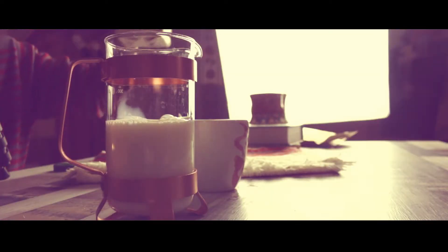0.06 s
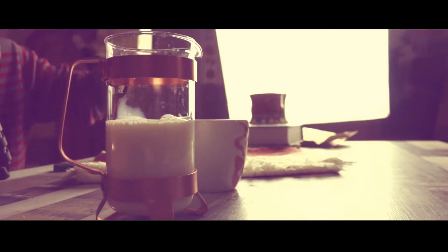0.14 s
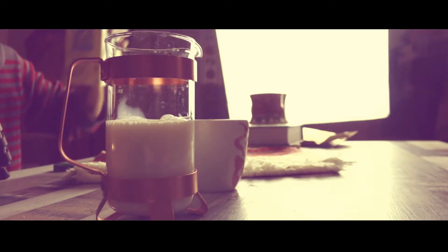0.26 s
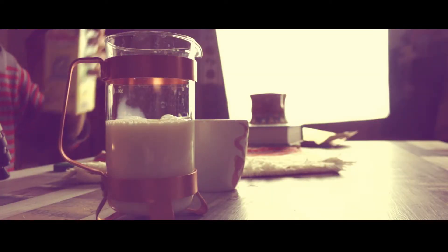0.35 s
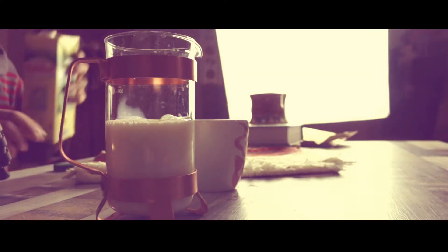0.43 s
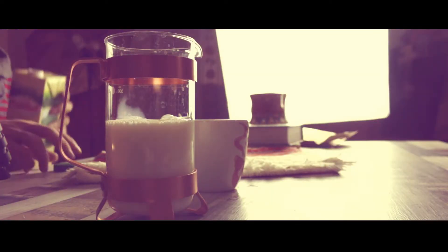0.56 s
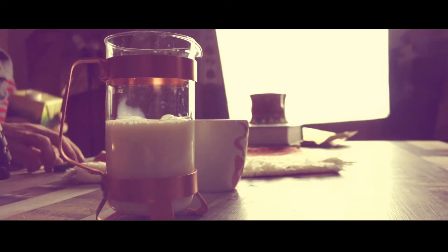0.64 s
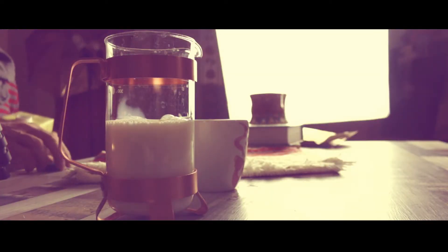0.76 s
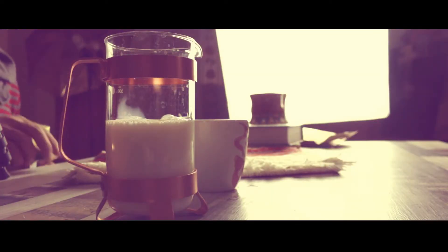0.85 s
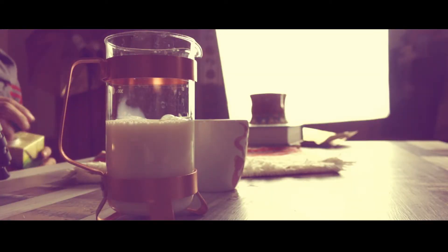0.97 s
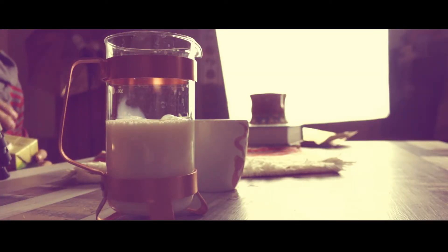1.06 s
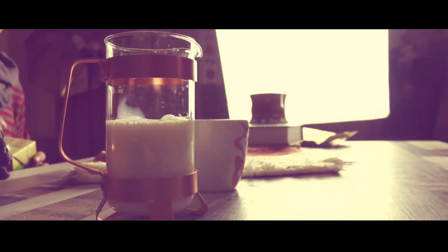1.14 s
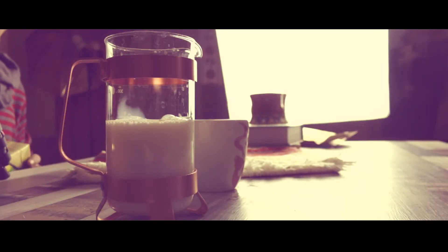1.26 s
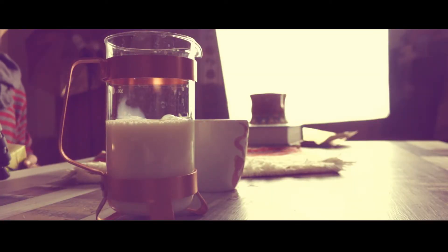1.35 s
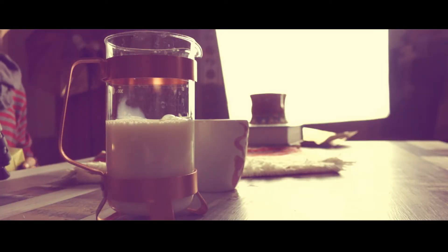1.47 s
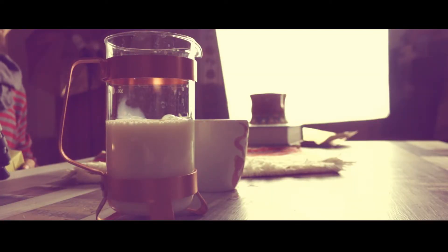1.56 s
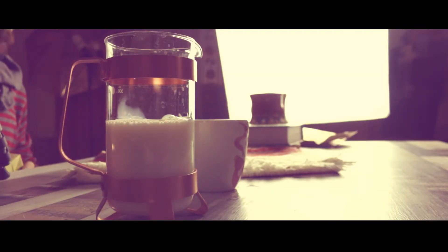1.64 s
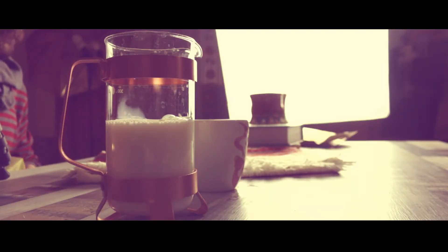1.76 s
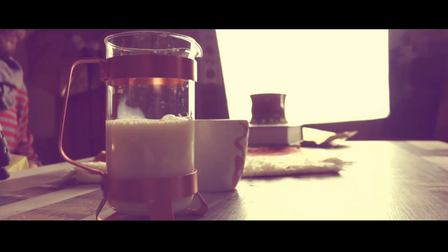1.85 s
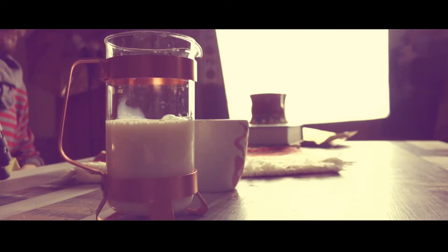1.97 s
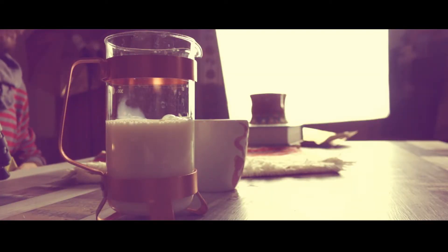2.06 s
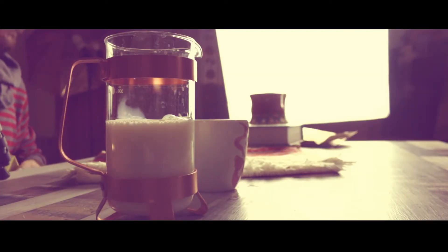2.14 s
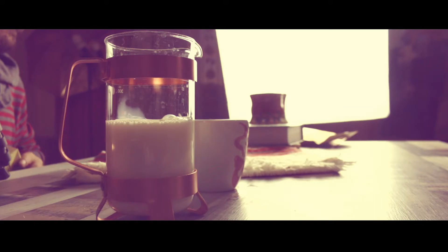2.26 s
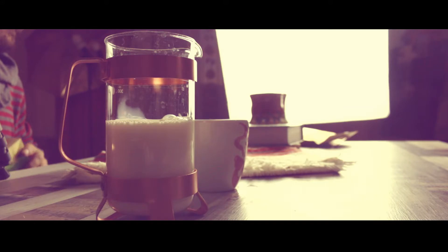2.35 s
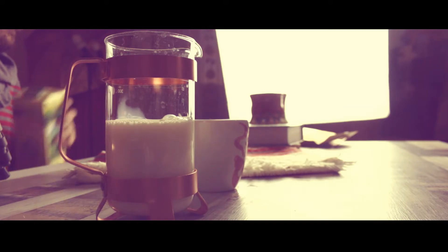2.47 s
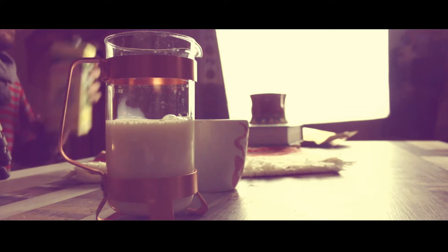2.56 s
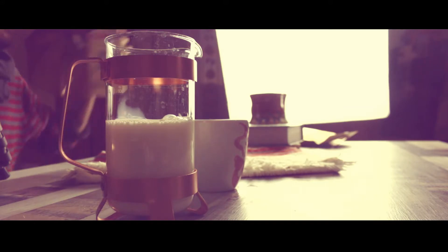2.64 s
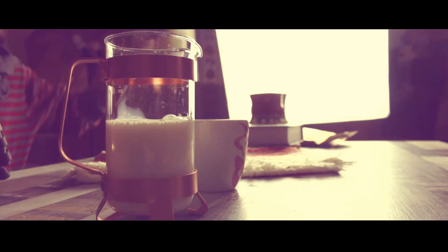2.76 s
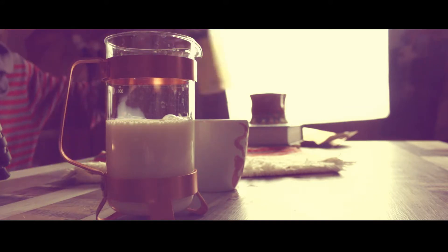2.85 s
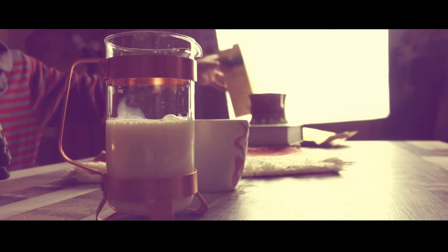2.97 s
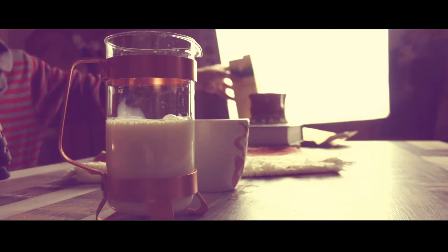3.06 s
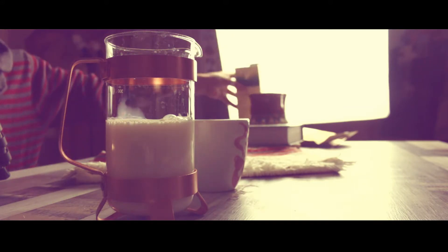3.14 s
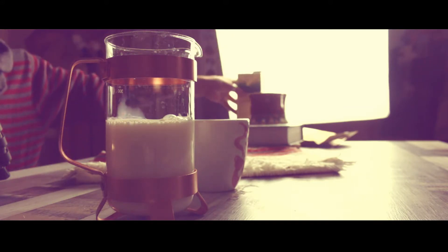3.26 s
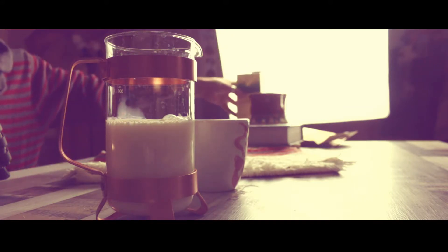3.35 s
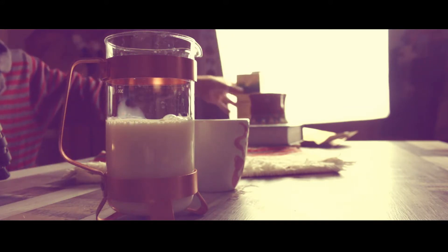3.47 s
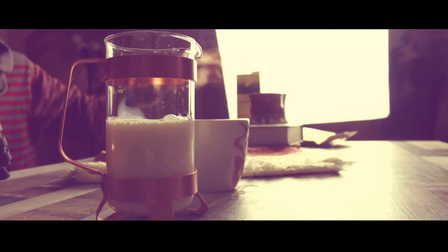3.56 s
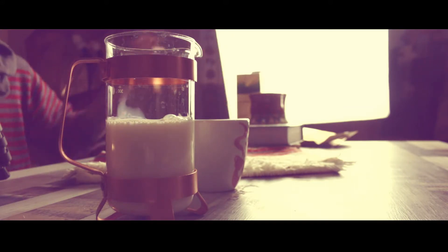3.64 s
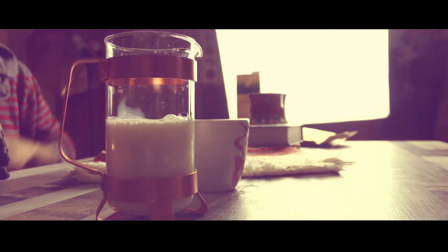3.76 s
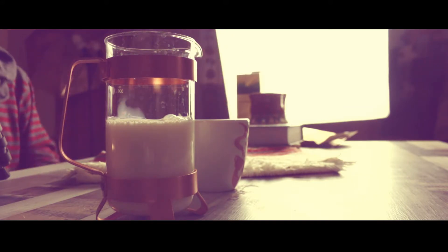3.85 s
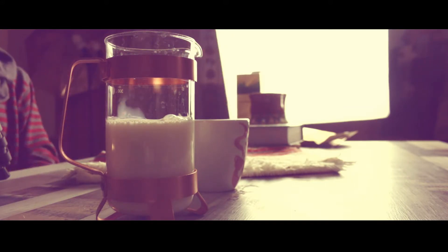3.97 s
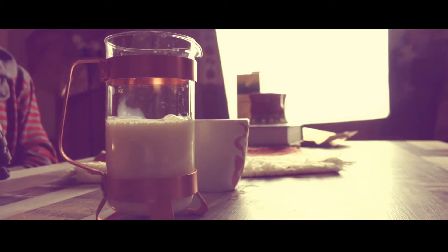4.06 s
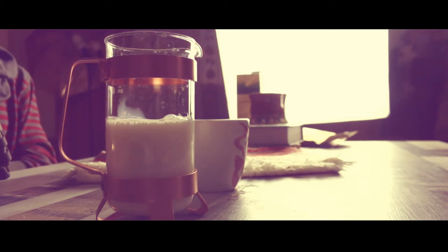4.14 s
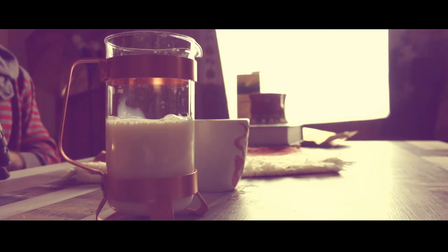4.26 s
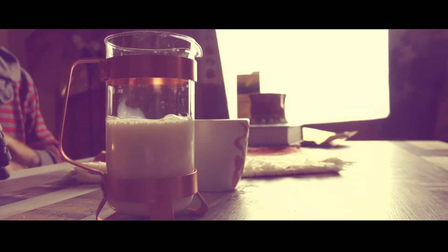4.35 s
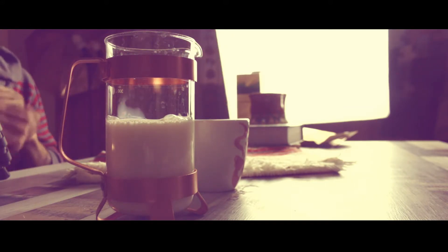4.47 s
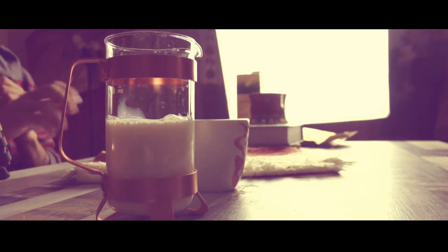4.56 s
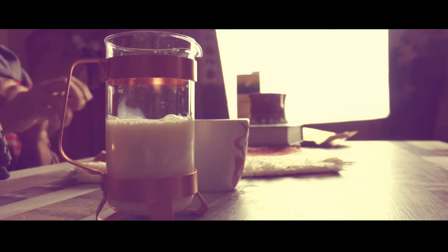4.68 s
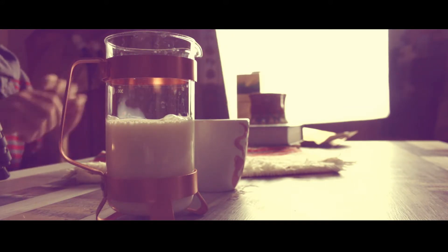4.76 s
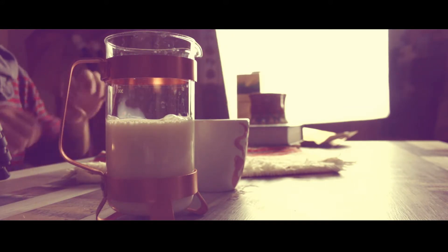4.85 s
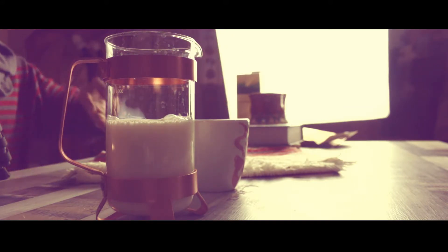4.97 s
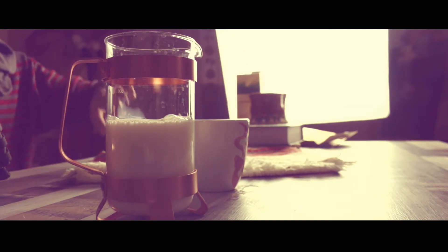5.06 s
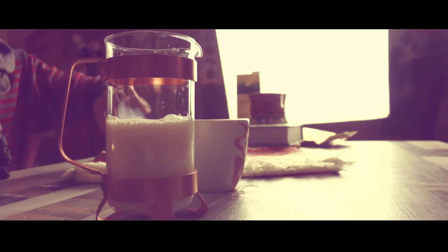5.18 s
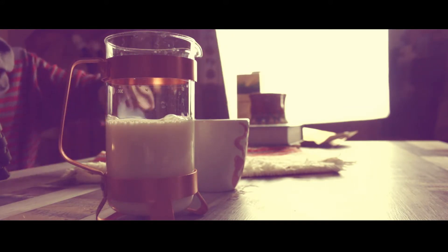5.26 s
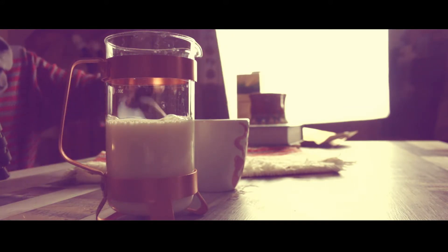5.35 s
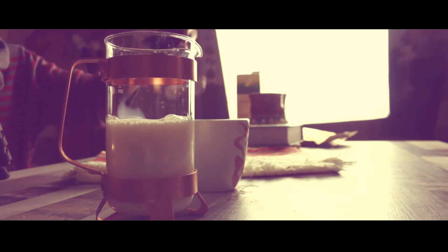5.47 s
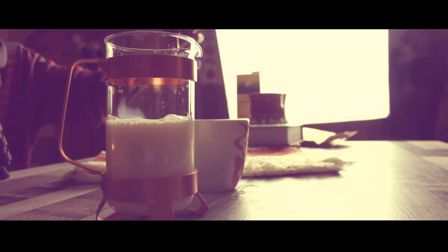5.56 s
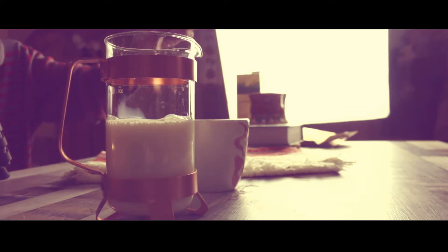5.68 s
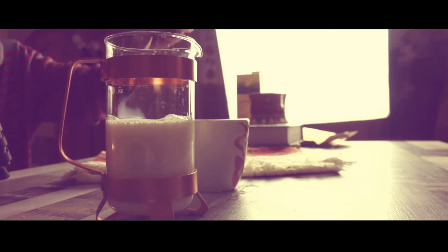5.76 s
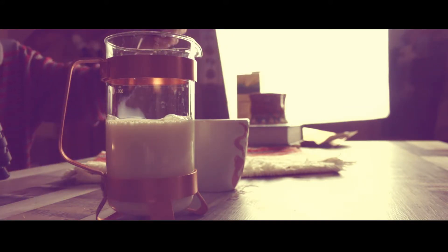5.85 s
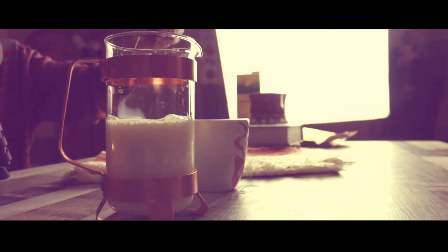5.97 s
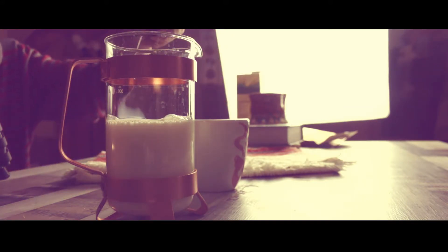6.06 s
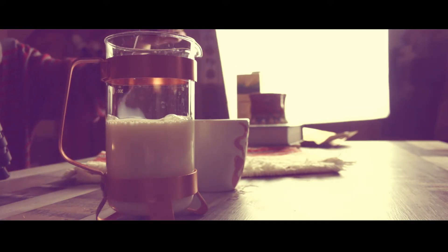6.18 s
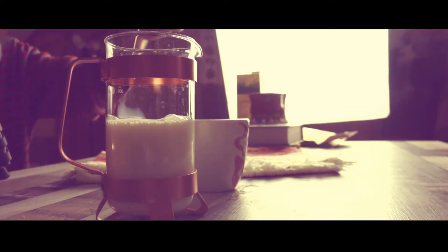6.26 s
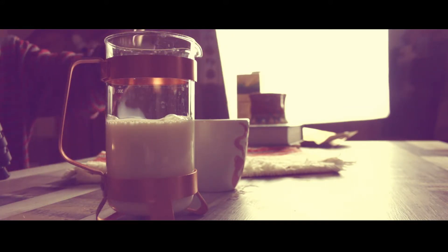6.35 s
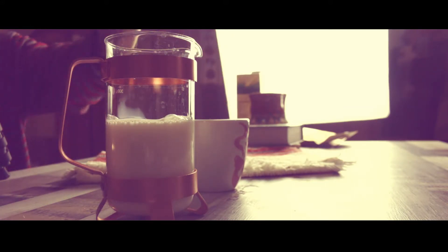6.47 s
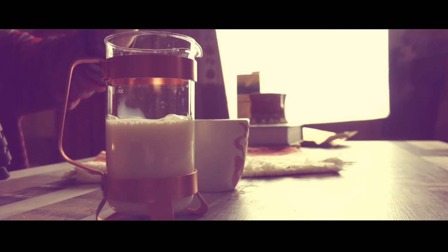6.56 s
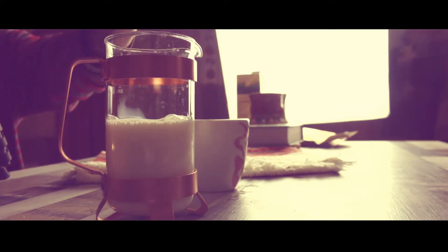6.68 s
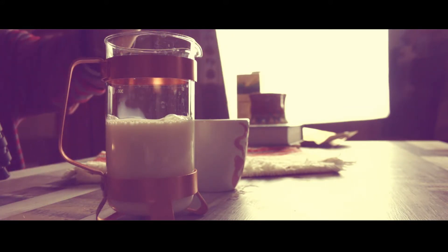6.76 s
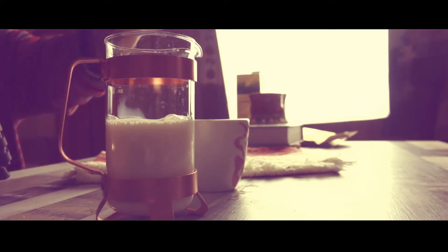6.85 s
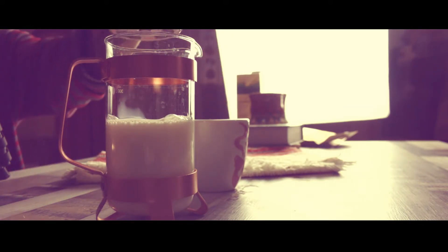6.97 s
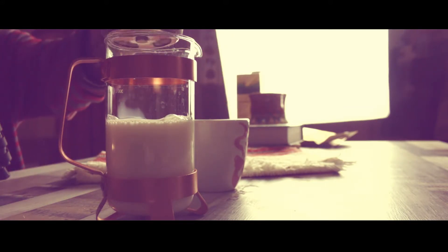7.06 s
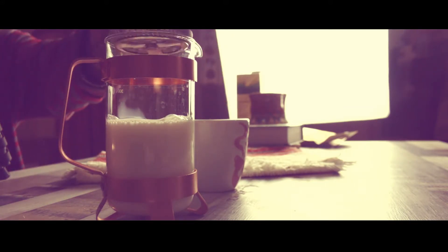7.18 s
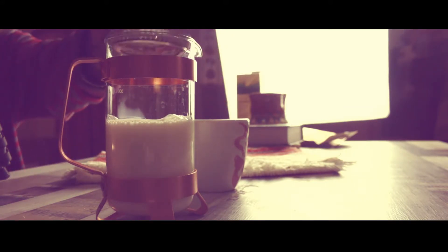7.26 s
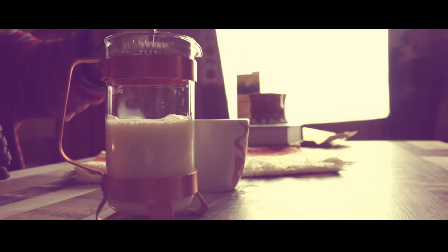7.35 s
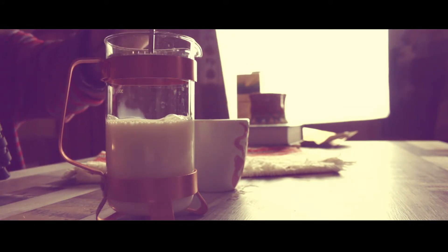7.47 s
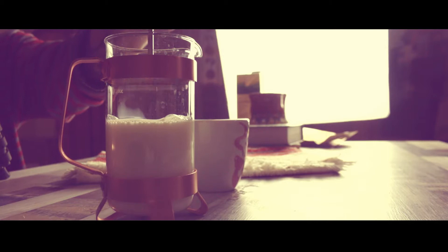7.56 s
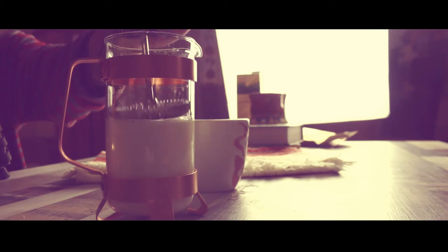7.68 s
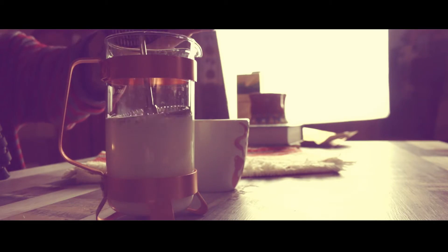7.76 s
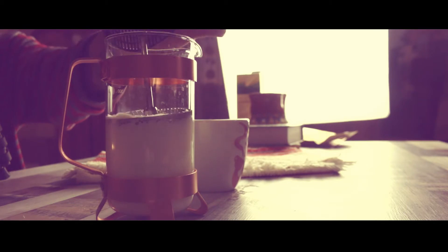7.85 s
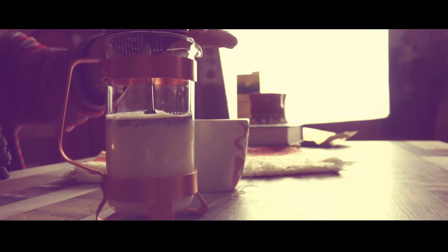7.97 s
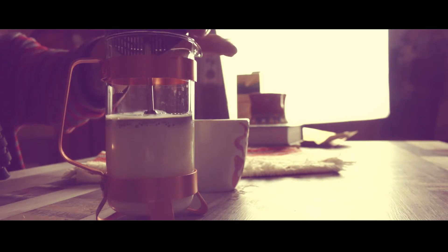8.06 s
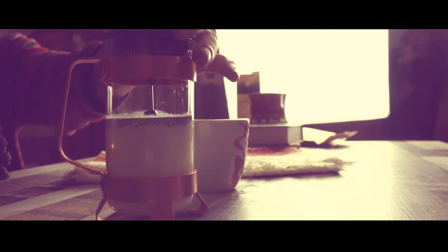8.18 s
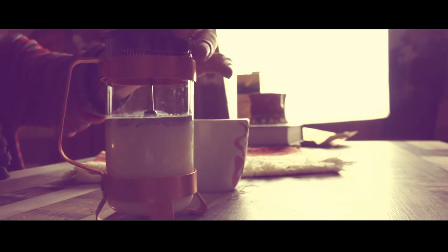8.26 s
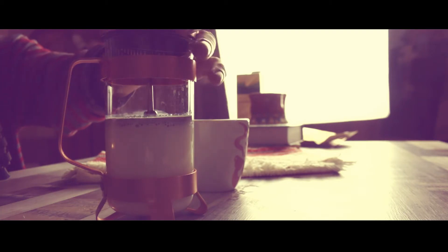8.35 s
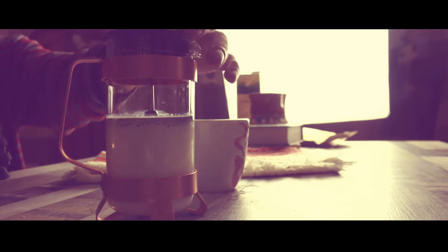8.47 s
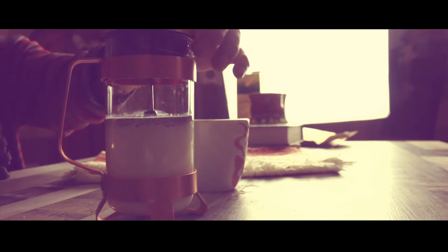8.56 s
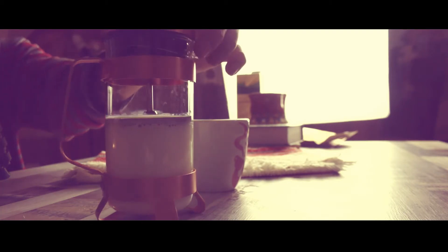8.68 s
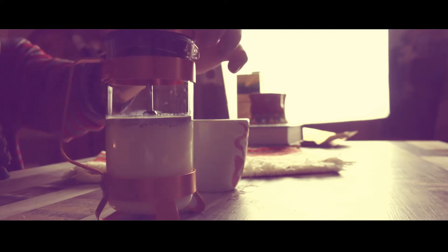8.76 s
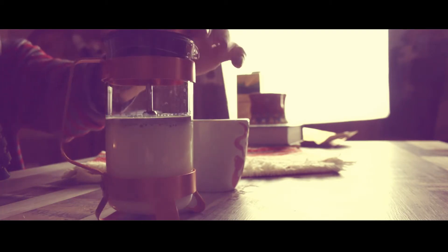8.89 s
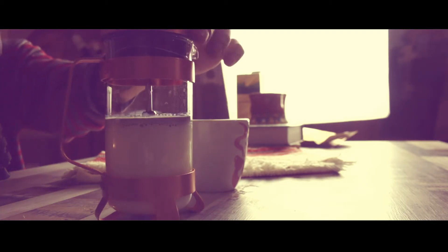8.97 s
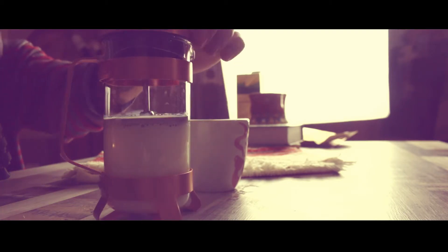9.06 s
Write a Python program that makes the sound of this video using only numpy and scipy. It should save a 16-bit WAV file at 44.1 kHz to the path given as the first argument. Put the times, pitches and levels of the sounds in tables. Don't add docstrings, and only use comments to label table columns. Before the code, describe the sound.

Light carton taps on the left, a thump onto a wooden table, metal clicks, then a loud lid snap on a glass jug.

```python
import sys
import numpy as np
from scipy import signal
from scipy.fft import rfft, irfft, next_fast_len
from scipy.io import wavfile
from scipy.ndimage import uniform_filter1d

SR = 44100
rng = np.random.default_rng(int(sys.argv[2]) if len(sys.argv) > 2 else 0)


def gain_from_db(level_db):
    decades = np.asarray(level_db, float) / 20
    return 10 ** decades


def transcribe(signal):
    frames = np.atleast_2d(signal).T
    limited = np.clip(frames, -1, 1)
    pcm = np.round(limited * 32767).astype(np.int16)
    wavfile.write(sys.argv[1], SR, pcm)


N = 402191
SPAN = 16384

# pitch_hz, width_hz, level_db
CARTON_BODY = [(380, 110, 2), (570, 95, 5.5), (900, 260, 2), (1310, 170, -9), (1550, 79, 4.5),
               (1684, 74, 8), (1920, 250, -4), (2850, 5300, -20.5), (3200, 150, -13), (4660, 520, -30),
               (6900, 1100, -41)]
# below_upper_split_db, above_upper_split_db
FROM_LEFT = (7.5, 2)
FROM_AHEAD = (4, 0)
FROM_JUG = (6.5, 0)
# lower_hz, upper_hz
BAND_SPLITS = (1100, 3500)


def carton_taps():
    # start_s, peak_db, treble_db, ring_hz, chatter_ms
    taps = [(0.6403, -43, 5, 380, 2.7), (0.678, -43, -1, 380, 6.3), (1.4592, -42.5, -22, 1840, 4.9),
            (1.4821, -36.5, -27, 1180, 8.5), (1.5209, -25.5, -30, 1300, 0.65),
            (1.6155, -21.5, -22, 600, 9.6), (1.6282, -16, -7.5, 1630, 1.03), (1.6305, -18.5, -4, 635, 5),
            (1.649, -38, 1, 1660, 10), (1.8279, -46, -2, 530, 4.4), (1.87, -35.5, -8.5, 496, 2.5),
            (1.969, -42, -14, 417, 3.5), (2.1195, -37.5, -2, 1600, 17), (2.3442, -32, -23, 900, 1.9),
            (2.3753, -40, -1.5, 870, 6), (2.4612, -46, -6, 450, 5), (2.4665, -48, -6, 1740, 4.3),
            (2.4994, -35, -17, 527, 7), (2.506, -34, -19, 532, 5.1), (2.555, -57, -10, 480, 3.6),
            (2.787, -46.5, -4, 557, 3), (2.8641, -50, -8, 460, 3.8), (2.965, -42, -7, 483, 6.7),
            (3.0321, -42, -1, 500, 12), (3.0528, -40.5, -2, 510, 4.8), (3.114, -48, 4, 2200, 6.4),
            (3.1227, -44.5, 5.5, 2920, 5.7), (3.138, -58, -1, 3100, 8), (3.15, -49.5, 1, 2400, 6),
            (3.269, -46, -1, 452, 4)]
    return contacts(taps, CARTON_BODY, FROM_LEFT, own_width=0.12, fill_db=-49, bass_db=-2.6,
                    hollow_db=-9.5, tick_db=-12)


def carton_rubs():
    # start_s, rise_s, fall_s, level_db, treble_db
    drag_strokes = [
        (.755, 0.015, 0.032, -38, -16),
        (.772, 0.026, 0.022, -38, -10.5),
    ]
    # start_s, rise_s, fall_s, level_db, treble_db
    soft_strokes = [
        (1.45, 0.073, 0.036, -58, -7),
        (1.84, 0.028, 0.079, -57, -3),
        (2.3, 0.066, 0.11, -61.5, 1),
        (2.45, 0.055, 0.083, -59, -0.5),
        (2.855, 0.018, 0.26, -62, -13),
        (3.02, 0.12, 0.17, -66, 4),
        (3.845, .012, 0.23, -59.5, -19),
    ]
    # pitch_hz, width_hz, level_db
    flap_body = [(990, 540, -28), (1450, 660, -1), (2830, 230, 1), (4300, 420, -8), (5670, 1350, 0.5),
                 (8200, 680, -1)]
    drag = rubbing(drag_strokes, flap_body, FROM_LEFT, spread_db=1.0, flutter_db=2, fill_db=-11.5,
                   bass_db=-4.5, rise_db=6.5, fall_db=24)
    soft = rubbing(soft_strokes, CARTON_BODY, FROM_LEFT, spread_db=2.0, flutter_db=3, fill_db=5.5,
                   bass_db=7.0, rise_db=2, fall_db=23)
    return drag + soft


def set_down():
    # start_s, peak_db, treble_db, ring_hz, chatter_ms
    landings = [
        (3.3509, -23, -23, 600, 9.9),
        (3.3596, -18, -14, 484, 12.7),
        (3.4537, -53, -10, 500, 3.8),
        (3.5205, -37.5, -0.5, 940, 7.9),
        (3.8515, -57, 2, 600, 6),
        (3.8598, -54, -11, 900, 6.2),
    ]
    # pitch_hz, width_hz, level_db
    stand_body = [(334, 230, 3), (500, 130, 9), (860, 83, -9.5), (1450, 250, -1.5), (1800, 124, 6),
                  (2000, 130, -7), (2410, 51, 8.5), (2600, 160, 2), (3400, 780, -7), (4440, 480, -28),
                  (7450, 1300, -16.5)]
    return contacts(landings, stand_body, FROM_AHEAD, own_width=0.04, fill_db=-15, bass_db=-5.0,
                    hollow_db=-8.5, tick_db=-14.5)


def plunger_parts():
    # start_s, peak_db, treble_db, ring_hz, chatter_ms
    clicks = [(5.2341, -30.5, 6, 4700, 6), (5.249, -30, -1, 4300, 5.5), (5.2559, -37, -5, 4630, 2.4),
              (5.2609, -31, -6, 2850, 17), (5.333, -33.5, 10.5, 7700, 8.4), (5.3375, -40, 2, 2600, 7.2),
              (5.3515, -44, 12, 7800, 2.2), (5.4461, -44.5, 8, 6560, 16), (5.6012, -44, -10, 4330, 3.6),
              (5.6538, -44.5, -15, 2300, 12), (5.7378, -46, -9, 2350, 16), (5.7905, -45, -3, 4000, 2.7),
              (5.8176, -20, 4, 6850, 4.9), (5.9843, -34.5, -11, 4400, 3.4), (6.1013, -22.5, 6.5, 7840, 2.5),
              (6.1065, -26.5, 7, 4950, 4), (6.2813, -35, 7, 8050, 2.7)]
    # pitch_hz, width_hz, level_db
    parts_body = [(990, 40, -15), (1450, 350, -7), (1840, 210, -6.5), (2180, 210, -1), (2540, 150, -2),
                  (2860, 250, -8), (4050, 230, -2.5), (4580, 250, -1), (4950, 180, 1.5), (5850, 250, -12),
                  (6740, 790, 1.5), (7170, 490, 5), (8070, 370, 4.5), (10300, 1200, -4)]
    sound = contacts(clicks, parts_body, FROM_AHEAD, own_width=0.065, fill_db=-15.5, bass_db=-22,
                     hollow_db=7.5, tick_db=-8.5)
    return mirrored(sound, lag_s=.0031, echo_db=-6.5)


def jug_rim():
    # start_s, peak_db, treble_db, ring_hz, chatter_ms
    clicks = [(7.15, -26, 9, 900, 9.4), (7.2252, -42.5, 10, 1600, 2.6), (7.31, -36, -7, 2000, 1.1),
              (7.3595, -48, -12, 2010, 5.7), (7.377, -44, 10, 3380, 5.1), (7.3968, -44, 2, 3640, 8),
              (7.403, -48, 14, 7460, 13), (7.427, -56, 14.5, 7060, 5), (7.4986, -50, 10, 6800, 3.1),
              (7.6132, -46, -16, 2300, 6.9), (7.7369, -50, -4, 476, 4), (7.8367, -45.5, 5, 6250, 6.8),
              (7.9432, -38, 14.5, 7140, 4.2), (8.0043, -43, 6, 4140, 3), (8.0393, -41, -17, 736, 5.9),
              (8.0801, -31.5, 2, 3990, 3.7)]
    # pitch_hz, width_hz, level_db
    rim_body = [(400, 530, -10.5), (900, 90, -3.5), (1230, 150, -22), (1600, 100, -3), (3190, 120, -8.5),
                (4400, 350, -8.5), (5420, 310, -5.5), (7120, 400, 1.5), (7200, 400, -16), (8300, 300, -17),
                (10100, 2600, -5)]
    return contacts(clicks, rim_body, FROM_JUG, own_width=0.052, fill_db=-11.0, bass_db=-5.0,
                    hollow_db=-5.0, tick_db=-6.5)


def lid_snap():
    # start_s, peak_db, treble_db, ring_hz, chatter_ms
    clicks = [(8.168, -37, -11, 2120, 3.6), (8.1746, -43.5, 11, 7200, 3.4), (8.1957, -26, 1, 720, 15),
              (8.2054, -26, 3.5, 5730, 12), (8.2245, -30, 9.5, 8200, 6.4), (8.2318, -28, 14, 4100, 2.3),
              (8.2349, -4, 2, 6500, 3.64), (8.2435, -13.5, -14, 2080, 3.9), (8.2575, -28, -6, 8240, 4),
              (8.2625, -20, -11, 1890, 5.7), (8.267, -23.5, 7.5, 2300, 3.6)]
    # pitch_hz, width_hz, level_db
    lid_body = [(533, 310, -4), (800, 690, -9), (1500, 360, -2), (2090, 230, 7.5), (2450, 200, 2.5),
                (3120, 180, -0.5), (3810, 180, 4), (4780, 200, -1.5), (5800, 310, -4), (6500, 280, 7),
                (7500, 400, 5.5), (8390, 480, 7.5)]
    return contacts(clicks, lid_body, FROM_JUG, own_width=0.064, fill_db=-5.5, bass_db=-4.5,
                    hollow_db=-11, tick_db=-5.5)


def knob_taps():
    # start_s, peak_db, treble_db, ring_hz, chatter_ms
    taps = [
        (8.6644, -42, -5, 770, 7.4),
        (8.6767, -36.5, -15, 1800, 11),
        (8.6865, -46, -9, 1800, 4),
        (8.7403, -38.5, -3, 400, 4.5),
        (8.7547, -23, -15, 1920, 2),
        (8.7585, -28.5, -7, 433, 3.5),
        (8.79, -45, -4, 2000, 7.5),
        (8.811, -53, -4, 2700, 14),
    ]
    # pitch_hz, width_hz, level_db
    knob_body = [(413, 150, 8.5), (1080, 720, -18), (1940, 790, -1), (3040, 150, -5), (7360, 2300, -2)]
    return contacts(taps, knob_body, FROM_JUG, own_width=0.12, fill_db=-23.0, bass_db=0.5,
                    hollow_db=1.0, tick_db=-5.5)


def mesh_rubs():
    # start_s, rise_s, fall_s, level_db, treble_db
    scrapes = [
        (7.33, 0.063, 0.058, -54, -1),
        (7.59, 0.047, 1, -62.5, 4),
        (8.15, 0.093, 0.017, -48.5, -8),
        (8.6, 0.039, 0.23, -61, -2.5),
        (8.765, 0.036, 0.052, -55.5, 7.5),
        (9.04, 0.08, .03, -59, 1),
    ]
    # pitch_hz, width_hz, level_db
    mesh_body = [(500, 3200, 9.5), (2300, 430, 13), (2800, 140, 6), (4300, 380, -26), (7100, 780, 8.5),
                 (8600, 890, 7.5), (11140, 2500, -35.5)]
    return rubbing(scrapes, mesh_body, FROM_AHEAD, spread_db=-0.5, flutter_db=3, fill_db=-20.0,
                   bass_db=3.0, rise_db=12.5, fall_db=23.5)


def sleeve_rubs():
    # start_s, rise_s, fall_s, level_db, treble_db
    brushes = [
        (3.94, 0.21, 0.12, -55, 1.9),
        (4.27, 0.07, 0.11, -61.5, 1),
    ]
    # pitch_hz, width_hz, level_db
    cloth_body = [(600, 920, 3), (2200, 1800, -4), (4200, 1700, -5), (7200, 3000, 3.5), (10600, 3000, -29)]
    return rubbing(brushes, cloth_body, FROM_AHEAD, spread_db=-1.0, flutter_db=0.5, fill_db=-12.5,
                   bass_db=-13, rise_db=13.5, fall_db=13)


def clear_rings():
    # start_s, pitch_hz, peak_db, time_to_fall_60_db_s
    tones = [(.641, 361, -41, 0.064), (.681, 363, -37.5, 0.028), (1.63, 1666, -34, 0.27),
             (1.63, 1550, -44, 0.36), (1.632, 625, -35, 0.37), (3.365, 2385, -44, 0.25),
             (3.37, 334, -36.5, 0.19), (3.521, 913, -31.5, 0.04), (5.236, 990, -48, 0.33),
             (5.819, 1450, -31, 0.042), (6.103, 1450, -40, 0.06), (5.338, 2540, -48, 0.39),
             (5.338, 3950, -48, 0.34), (6.106, 4900, -59, 0.3), (7.151, 900, -49, 0.86),
             (7.23, 800, -55, 0.45), (7.615, 2300, -61, 0.35), (7.945, 330, -34.5, 0.023),
             (8.081, 4090, -41, 0.082), (8.081, 849, -48, 0.18), (8.169, 800, -43.5, 0.29),
             (8.198, 810, -37.5, 0.32), (8.238, 534, -18, 0.13), (8.27, 515.7, -32.5, 0.4),
             (8.236, 2450, -35, 0.44), (8.236, 2090, -45, 0.56), (8.236, 3900, -39, 0.6),
             (8.236, 4160, -40, 0.5), (8.7555, 443, -30.5, 0.023)]
    out, t = np.zeros(N), np.arange(2 * SPAN) / SR
    for start, hz, db, t60 in tones:
        steps = np.repeat(rng.standard_normal(2 * SPAN // 256), 256)
        waver = uniform_filter1d(steps, size=256) * np.clip(t / .03, 0, 1)
        loudness = gain_from_db(db - 60 * t / t60 + 4 * waver)
        add(out, loudness * np.sin(2 * np.pi * hz * t + 1.3 * waver), start)
    return ears(FROM_AHEAD[0]) / ears(FROM_AHEAD[0]).mean() * out


def contacts(touches, modes, place, own_width, fill_db, bass_db, hollow_db, tick_db):
    out = np.zeros((2, N))
    for start, db, bright_db, ring_hz, ms in touches:
        detune = 1 + .012 * rng.standard_normal(len(modes))
        struck = [(hz * d, width, level) for (hz, width, level), d in zip(modes, detune)]
        struck.append((ring_hz, own_width * ring_hz, 6))
        bands = body(chatter(ms, tick_db), struck, fill_db)
        low_db = hollow_db * (ring_hz < BAND_SPLITS[0])
        peaks = gain_from_db(db + np.array([low_db, bass_db, bright_db]))
        bands = bands * (peaks / abs(bands).max(axis=1))[:, None]
        add(out, shaded(bands, place), start)
    return out


def chatter(ms, tick_db, count=2048):
    t = np.arange(count) / SR
    fall_s = min(ms, 14) / 1000
    shape = np.exp(-(t / fall_s) ** 1.2)
    shape = shape / np.sqrt(np.sum(shape ** 2)) + gain_from_db(tick_db) * signal.unit_impulse(count, 1)
    impacts = grit(count, 1.62) * shape
    for _ in range(4):
        flat = irfft(np.exp(1j * np.angle(rfft(impacts))), count)
        impacts = np.sign(flat) * np.sqrt(abs(flat) * shape) * (shape > .002 * shape[2])
    return np.pad(flat * np.exp(-t / (.004 + 3 * fall_s)), (0, SPAN // 2 - count))


def rubbing(strokes, modes, place, spread_db, flutter_db, fill_db, bass_db, rise_db, fall_db):
    t = np.arange(N) / SR
    steps = np.repeat(rng.standard_normal(N // 400 + 1), 400)[:N]
    slips = grit(N, spread_db) * gain_from_db(flutter_db * uniform_filter1d(steps, size=300))
    padding = next_fast_len(N, True) - N
    bands = body(np.pad(slips, (0, padding)), modes, fill_db)[:, :N]
    gains = 0
    for start, rise, fall, db, bright_db in strokes:
        hardest, end = start + rise, start + rise + fall
        touch = np.clip(np.minimum(t - start, end - t) / .008, 0, 1)
        pressure = touch * gain_from_db(db - np.interp(t, [start, hardest, end], [rise_db, 0, fall_db]))
        gains = gains + pressure * gain_from_db(np.array([[0], [bass_db], [bright_db]]))
    return shaded(gains * bands / bands.std(axis=1, keepdims=True), place)


def grit(count, spread_db):
    return rng.standard_normal(count) * gain_from_db(spread_db * rng.exponential(size=count))


def ring(f, hz, width):
    return 1j * f * width / (hz ** 2 - f ** 2 + 1j * f * width)


def body(x, modes, fill_db):
    f = np.arange(len(x) // 2 + 1) * SR / len(x)
    power = gain_from_db(2 * fill_db)
    for hz, width, db in modes:
        power = power + gain_from_db(2 * db) * abs(ring(f, hz, abs(width))) ** 2
    cepstrum = irfft(np.log(power), len(x)) * (np.arange(len(x)) < len(x) // 2)
    sound = rfft(x) * np.exp(rfft(cepstrum) - cepstrum[0] / 2)
    lower, upper, top = (1j * f / hz for hz in (*BAND_SPLITS, 11500))
    low, high, air = (1 / (1 + np.sqrt(2) * s + s ** 2) for s in (lower, upper, top))
    rumble_cut = (lower / (lower + 0.25)) ** 2
    middle = (low * lower ** 2 * high) ** 2
    bass = low ** 2 * rumble_cut
    treble = (high * upper ** 2) ** 2
    return irfft(sound * air ** 2 * np.array([middle, bass, treble]), len(x))


def ears(pan_db):
    return gain_from_db(np.array([[pan_db], [-pan_db]]) / 2)


def shaded(bands, place):
    middle, bass, treble = bands
    deep = middle + bass
    lower_gains = ears(place[0]) / ears(place[0]).mean()
    upper_gains = ears(place[1]) / ears(place[1]).mean()
    lower = lower_gains * np.array([np.roll(deep, 1), deep])
    return lower + upper_gains * np.array([(treble + np.roll(treble, 1)) * 0.5, treble])


def mirrored(x, lag_s, echo_db):
    return x + gain_from_db(echo_db) * np.roll(x, int(lag_s * SR), axis=1)


def add(out, sound, start_s):
    i = int(start_s * SR)
    out[..., i:i + sound.shape[-1]] += sound[..., :N - i]


def on_log(table, f):
    table = np.array(table)
    return np.interp(np.log(f + 1), np.log(table[:, 0]), table[:, 1])


def table_top():
    # start_s, peak_db, boom_hz, time_to_fall_60_db_s
    blows = [(0.642, -47, 171, 0.3), (0.679, -44, 108, 0.14), (0.718, -42, 88, 0.27),
             (0.851, -50, 90, 0.33), (0.927, -47, 97, 0.38), (1.63, -48, 101, 0.34),
             (3.351, -24.5, 98, 0.23), (3.407, -25.5, 93.6, 0.29), (3.52, -40, 30, 0.72),
             (7.147, -30, 103, 1), (7.22, -33.5, 27.2, 0.33), (7.308, -34, 118.7, 1),
             (7.377, -36, 89.3, 0.81), (7.43, -38, 81.6, 0.37), (7.948, -41.5, 117.6, 0.43),
             (8.199, -36, 117, 0.3), (8.278, -31, 76, 0.3), (8.333, -33.5, 78.3, 0.32),
             (8.67, -36.5, 75.6, 0.39), (8.748, -39, 71, 0.53), (8.819, -37, 100.6, 0.41),
             (9.001, -38.5, 95, 0.24), (9.068, -43, 78.5, 0.25)]
    # pitch_hz, width_hz, level_db
    board_modes = [(30.2, 1.2, -8.5), (60.3, 2.7, -1), (94.4, 6.9, -4.5), (136.7, 25, -10.5),
                   (242, 210, -16)]
    out, t = np.zeros(N), np.arange(SPAN) / SR
    f = np.arange(SPAN // 2 + 1) * SR / SPAN
    push = rfft(np.sin(np.pi * np.clip(t / 0.0045, 0, 1)))
    board = 0
    for k, (hz, width, db) in enumerate(board_modes):
        board = board + (-1) ** k * gain_from_db(db) * ring(f, hz, width)
    for start, db, hz, t60 in blows:
        spot = ring(f, hz, np.log(1000) / (np.pi * t60))
        boom = irfft(push * (board + spot), SPAN)
        fade = np.cos(np.pi / 2 * t / t[-1])
        add(out, gain_from_db(db) * boom / abs(boom).max() * fade, start)
    left_lead = 0.7
    turn = np.exp(.5j * left_lead * np.array([[1], [-1]]))
    return ears(1.5) * np.real(signal.hilbert(out) * turn)


def room(x):
    # pitch_hz, time_to_fall_60_db_s, level_db
    echo_bands = [(125, 0.58, 18), (287, 0.6, 9), (600, 0.69, -1), (1270, 0.53, 4), (2400, 0.58, 5),
                  (4600, 0.64, 2), (7700, 0.51, 1), (13500, 0.46, -7)]
    t = np.arange(SR) / SR
    f = np.arange(SR // 2 + 1.)
    noise, tail = rfft(rng.standard_normal((2, SR))), 0
    for k, (_, t60, db) in enumerate(echo_bands):
        only_this = [(row[0], j == k) for j, row in enumerate(echo_bands)]
        band = irfft(noise * on_log(only_this, f), SR)
        tail = tail + gain_from_db(db - 60 * t / t60) * band
    tail = tail * np.clip((t - .003) / 0.013, 0, 1)
    tail = tail / np.sqrt(np.sum(tail ** 2) / 2)
    return signal.fftconvolve(x[None], tail, axes=1)[:, :N]


def kitchen():
    # pitch_hz, level_db (per Hz)
    hiss_colour = [(12, -50), (22, -4.5), (102, -4), (370, -8), (908, -12), (2950, -18.5), (15000, -25),
                   (16300, -32.5)]
    # pitch_hz, likeness (-1 to 1)
    hiss_likeness = [(60, 0.53), (130, 0.32), (290, 0.08), (640, -0.29), (1410, -0.3), (3100, -0.35),
                     (6820, -0.00098), (15000, -0.1)]
    # pitch_hz, left_minus_right_db
    hiss_lean = [(60, 4.5), (110, 4), (200, 3), (700, 2), (1290, 2.5), (2380, 2.5), (8120, 0), (15000, 1)]
    hum_pitches = (100.1, 98.75)
    hum_levels = (-66.5, -67)
    f = np.arange(N // 2 + 1) * SR / N
    like = on_log(hiss_likeness, f)
    mid, side = rfft(rng.standard_normal((2, N))) * np.sqrt([1 + like, 1 - like])
    lean = on_log(hiss_lean, f) / 2
    sides = np.array([(mid + side) * gain_from_db(lean), (mid - side) * gain_from_db(-lean)])
    air = irfft(gain_from_db(on_log(hiss_colour, f)) * sides, N)
    air = air * gain_from_db(-57.5) / air.mean(axis=0).std()
    t = np.arange(N) / SR - 4.56
    hum = sum(gain_from_db(db) * np.sin(2 * np.pi * hz * t) for hz, db in zip(hum_pitches, hum_levels))
    return air + ears(FROM_AHEAD[0]) * hum


def scene():
    sources = [  # sound, share of the room in dB
        (carton_taps(), -3.5),
        (carton_rubs(), -4.5),
        (set_down(), -3.5),
        (plunger_parts(), -7),
        (jug_rim(), -7.5),
        (lid_snap(), -7.5),
        (knob_taps(), -11),
        (mesh_rubs(), -6.5),
        (sleeve_rubs(), -4.5),
        (clear_rings(), -9)]
    near = sum(sound for sound, _ in sources)
    far = sum(gain_from_db(wet_db) * sound.mean(axis=0) for sound, wet_db in sources)
    return near + ears(2.95) * room(far) + table_top() + kitchen()


def top_cut(x):
    return signal.sosfilt(signal.butter(12, 16470, fs=SR, output="sos"), x)


def record(dry):
    mix = np.clip(dry, -1, 1)
    return top_cut(mix)


dry = scene()
out = record(dry)
transcribe(out)
```